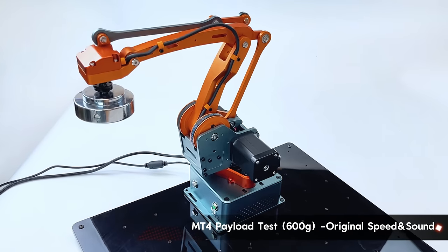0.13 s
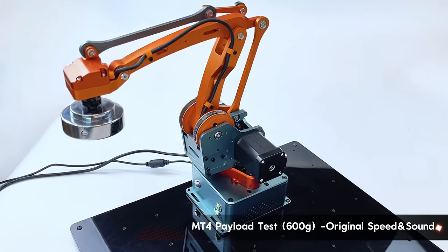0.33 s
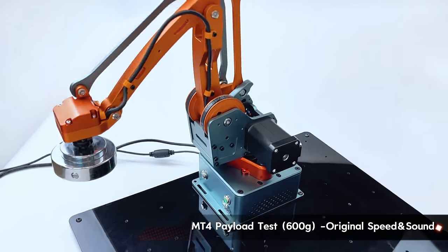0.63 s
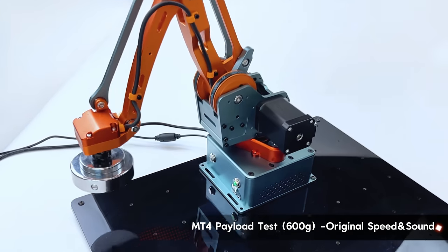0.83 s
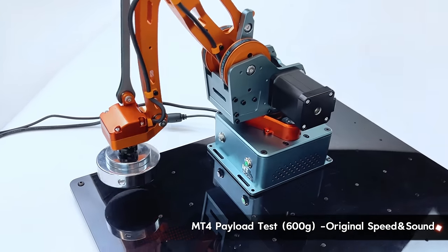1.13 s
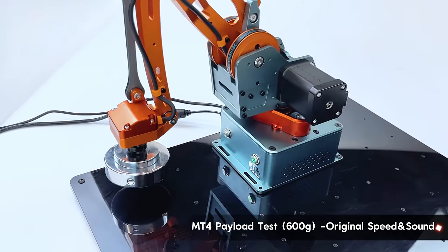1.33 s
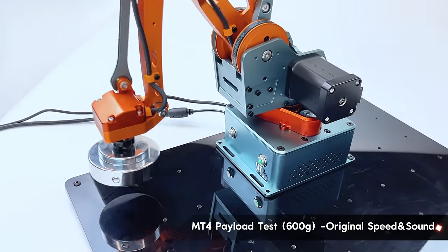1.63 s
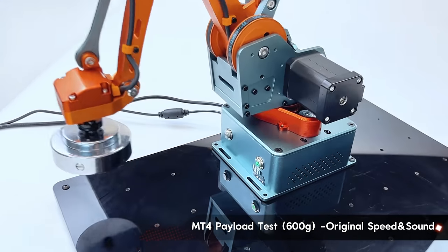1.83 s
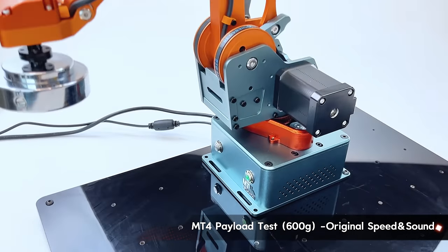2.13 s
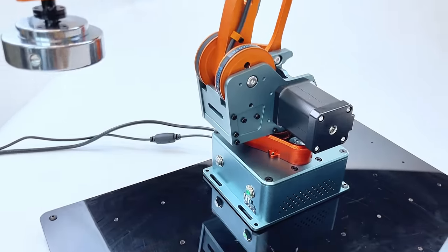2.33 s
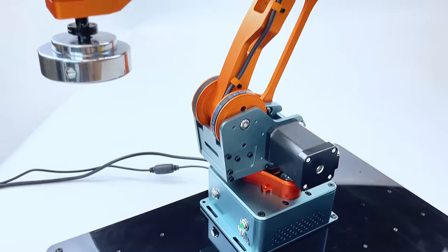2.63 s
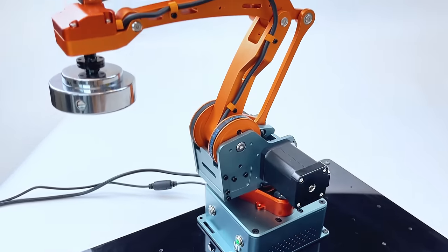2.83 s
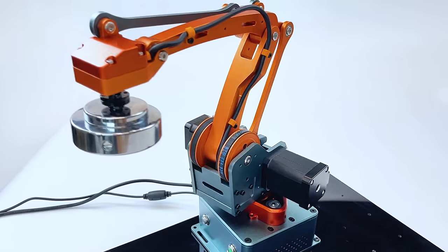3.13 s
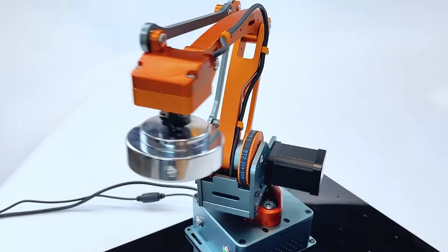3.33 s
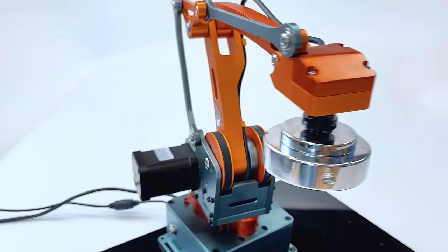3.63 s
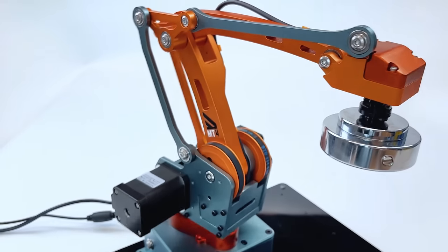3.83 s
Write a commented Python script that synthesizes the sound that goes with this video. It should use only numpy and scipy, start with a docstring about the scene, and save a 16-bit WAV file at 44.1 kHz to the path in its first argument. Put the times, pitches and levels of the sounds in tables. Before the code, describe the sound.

Stepper motors of a small robot arm give a smooth low hum, rising from about 0.2 s, peaking near 0.7 and fading by 1.1. A second rise and fall runs from 1.7 to 2.5 s, swelling unevenly as the plate resonates. Soft low thumps and rumble cluster from 1.5 to 2.9. From 3.2 s the base turns with a fainter hum, thin whine and grainy high hiss. Room fans hiss steadily throughout, close stereo.

```python
"""A steel plate in a room with fans: a small robot arm on it lowers and lifts a weight, then turns on its base.
Two stepper motors sound as sines sweeping up and down in pitch, swelling where the plate resonates.
The base drive is a set of whining sines, a band of grainy hiss and two ticks.
Fans are wavering sines over coloured noise; a low noise rumble with soft thumps lies below.
Two close microphone ports differ in phase and level by frequency."""
import sys
import numpy as np
from scipy import signal
from scipy.fft import rfft, irfft
from scipy.io import wavfile
from scipy.ndimage import uniform_filter1d

SR = 44100
rng = np.random.default_rng(int(sys.argv[2]) if len(sys.argv) > 2 else 0)


def gain_from_db(level_db):
    """Turn a decibel level (scalar or array-like) into a linear amplitude factor."""
    decades = np.asarray(level_db, float) / 20
    return 10 ** decades


def file_out(sig):
    """Save sig as 16-bit WAV at sys.argv[1]."""
    # one column per channel
    cols = np.atleast_2d(sig).T
    # limit, then scale
    lim = np.clip(cols, -1, 1)
    pcm = np.round(lim * 32767).astype(np.int16)
    wavfile.write(sys.argv[1], SR, pcm)


N = 176400

# low noise colour: (frequency [Hz], relative density [dB per Hz])
RUMBLE_COLOUR = [(35, -18.5), (50, -1.5), (90, -0.5), (120, -2.5), (170, -9.5), (300, -19), (420, -27),
                 (900, -120)]
# low noise level before lumps: (time [s], rms level [dB])
RUMBLE_LEVEL = [(0, -38.5), (.3, -39.5), (.45, -35.5), (.8, -37), (1.2, -40), (1.5, -35.5), (1.8, -33),
                (2.3, -32.5), (2.6, -37.5), (2.9, -37), (3.05, -40), (3.2, -61)]
# soft thumps, each a short swell of one or two cycles: (time [s], peak level [dB])
THUMPS = [(1.474, -18.5), (1.728, -20.5), (2.439, -21.5), (2.532, -20.5), (2.551, -18.5), (2.624, -33),
          (2.68, -23), (2.701, -29.5), (2.802, -23), (2.841, -22.5), (2.879, -25.5), (2.933, -27),
          (3.123, -30), (3.623, -30.5), (3.883, -33)]
# blade tones before fade and roughness: (frequency [Hz], rms level [dB])
FAN_LINES = [(397, -61), (452, -65), (793, -68), (908, -73), (1190, -73.5), (1587, -69), (3368, -74),
             (5027, -82)]
# blade tones recede as the listener moves: (time [s], gain [dB])
FAN_FADE = [(.9, 3), (1.6, 2.5), (3.1, -2.5)]
# fan and room hiss colour: (frequency [Hz], relative density [dB per Hz])
AIR_COLOUR = [(25, -19), (60, 8), (146, 5), (210, -0.5), (310, -3), (430, -7), (520, -6), (690, -11),
              (820, -14), (1050, -15.5), (1300, -15), (1600, -8), (1750, -13.5), (2000, -18.5), (2500, -19),
              (2900, -24), (3400, -20), (3900, -18.5), (4500, -23), (5200, -28.5), (8500, -35),
              (12000, -43.5), (14300, -45), (15000, -72)]
# base turn: (time [s], share of full speed [0-1], gain of low tones [dB], gain of high whine [dB])
BASE_TURN = [(3.2, .76, -11, -24), (3.34, 1, -2, -7), (3.53, 1, -3, 5), (3.9, 1, 0, 7)]
# base step and gear tones at full speed, before those gains: (frequency [Hz], rms level [dB])
BASE_LINES = [(150, -52), (307, -57), (603, -63), (2013, -64.5), (2250, -71), (5857, -82.5), (6988, -84)]
# hiss of the base drive, before grain: (time [s], centre frequency [Hz], rms level [dB])
BASE_HISS = [(2.98, 11500, -92), (3.15, 11500, -72.5), (3.35, 11400, -72.5), (3.55, 11400, -75.5),
             (3.72, 12800, -71.5), (3.88, 13440, -69.5), (4, 12500, -76)]
# base drive ticks: (time [s], peak level [dB], frequency [Hz])
BASE_TICKS = [(2.941, -62, 13030), (3.146, -58, 11500)]
# arm speed ramps: (start [s], top [s], end [s], shoulder peak before rounding [Hz],
# elbow peak before rounding [Hz], overtones at resonance [dB])
ARM_MOVES = [(.039, .71, 1.45, 308, 222, -78), (1.428, 2.072, 2.81, 307, 221, -63)]
# step tones swelling where the plate resonates, one list per move: (time [s], rms level [dB])
SHOULDER_LEVEL = [
    [(.22, -55), (.33, -31), (.37, -33), (.47, -42.5), (.51, -32), (.54, -24), (.566, -40.5), (.588, -24.5),
     (.62, -38.5), (.7, -25), (.756, -28), (.79, -40.5), (.84, -37.5), (.87, -57)],
    [(1.7, -40.5), (1.88, -41.5), (1.98, -37), (2.08, -29.5), (2.126, -29.5), (2.168, -37.5), (2.205, -31),
     (2.254, -36.5), (2.294, -25.5), (2.326, -44), (2.37, -34), (2.43, -34.5), (2.48, -46.5)],
]
ELBOW_LEVEL = [
    [(.58, -34), (.66, -41.5), (.72, -31), (.8, -42.5), (.88, -32.5), (.92, -41.5), (1.01, -29),
     (1.06, -46)],
    [(1.8, -49), (1.86, -36), (1.95, -42), (2.09, -32), (2.2, -39), (2.3, -65)],
]
# shoulder overtones heard as they cross an arm resonance: (multiple of step rate, resonance [Hz])
ARM_OVERTONES = [(4, 1070), (6, 1600)]
# part of the noise common to both ports: (frequency [Hz], share of power [0-1])
PORT_LIKENESS = [(60, 0.74), (300, 1), (550, 0.81), (700, 0), (1600, 0.52), (1900, 0.7), (4000, 0.93),
                 (6800, 0.64), (8200, 1), (10000, 0.6)]
# phase between ports: (frequency [Hz], left lead [rad])
PORT_LEAD = [(0, -.2), (620, -.85), (780, 1.0), (1200, -.2), (1600, -3), (1720, -5.7), (2300, -5.9),
             (3000, -5.2), (4600, -6), (5600, -7.3), (6800, -7.4), (7700, -9.4), (8800, -9.4),
             (11000, -12.5), (13000, -12.6), (14500, -15.7)]
# level between ports: (frequency [Hz], left minus right [dB])
PORT_TILT = [(60, 0.5), (200, 1), (550, 0), (780, -3.5), (1200, 0), (1600, 0.5), (1800, 7.5), (2200, 1),
             (4500, 2.5), (6000, 0)]

RUMBLE_LUMP_DB = 1
THUMP_HZ, THUMP_SPREAD_SHARE, THUMP_SIGMA_S = 73.7, 0.094, 0.0058
FAN_ROUGH_DB, FAN_WANDER_SHARE = 2.8, 0.001
AIR_DB, AIR_PATCHY_DB = -43.5, 0.96
BASE_ROUGH_DB, WHINE_FROM_HZ = 2.5, 4000
HISS_WIDTH_HZ, HISS_GRAIN_DB = 2200, 2
RAMP_ROUND_S = .08  # rounds the turn at top speed
STEP_ROUGH_DB, STEP_JITTER_SHARE = 1.6, 0.01
ARM_RING_WIDTH_HZ = 140  # overtones are 6 dB down this far off resonance

TIME_S = np.arange(N) / SR
BIN_HZ = np.arange(N // 2 + 1) * SR / N


def rms_one(x):
    """Scale to rms 1."""
    return x / np.sqrt(np.mean(x ** 2) + 1e-20)


def in_time(rows, outside=None):
    """Columns of a table, joined linearly in time."""
    time_s, *columns = np.transpose(rows)
    return [np.interp(TIME_S, time_s, c, left=outside, right=outside) for c in columns]


def at_hz(points, hz):
    """A table read on a log-frequency axis."""
    point_hz, value = np.transpose(points)
    return np.interp(np.log(hz + 1), np.log(point_hz + 1), value)


def drift(rate_hz):
    """Slow chance, spread 1: noise through two equal low-pass poles, run at SR / 40."""
    pole = np.exp(-80 * np.pi * rate_hz / SR)
    white = rng.standard_normal(N // 40 + 2002)
    slow = signal.lfilter([1], [1, -2 * pole, pole * pole], white)[2000:]  # settled part
    return np.interp(np.arange(N) / 40, np.arange(len(slow)), rms_one(slow - slow.mean()))


def tone(hz, db):
    """A sine on a pitch curve and an rms level curve, its ends eased."""
    ends = np.clip(np.minimum(np.arange(N), N - np.arange(N)) / 200, 0, 1)
    cycles = np.cumsum(hz * np.ones(N)) / SR + rng.random()
    return np.sqrt(2) * gain_from_db(db) * ends * np.sin(2 * np.pi * cycles)


def at_ports(x, own=None):
    """Two ports: a shared part with its phase lead, plus any part of each port's own, then tilt."""
    sides = np.array([[.5], [-.5]])  # left, right
    lead_hz, lead_rad = np.transpose(PORT_LEAD)
    ports = rfft(x) * np.exp(1j * sides * np.interp(BIN_HZ, lead_hz, lead_rad))
    if own is not None:
        alike = np.clip(at_hz(PORT_LIKENESS, BIN_HZ), 0, 1)
        ports = np.sqrt(alike) * ports + np.sqrt(1 - alike) * rfft(own)
    return irfft(ports * gain_from_db(sides * at_hz(PORT_TILT, BIN_HZ)), N)


def noise(colour):
    """Stereo noise of a given colour, rms 1: one shared source and one per port."""
    white = rng.standard_normal((3, N))
    coloured = irfft(rfft(white) * gain_from_db(at_hz(colour, BIN_HZ)), N)
    return rms_one(at_ports(coloured[0], coloured[1:]))


def rumble():
    """Lumpy low noise, with soft thumps as Gaussian swells of a low cosine."""
    level_db, = in_time(RUMBLE_LEVEL)
    out = gain_from_db(level_db + RUMBLE_LUMP_DB * drift(22.6)) * noise(RUMBLE_COLOUR)
    for peak_s, db in THUMPS:
        age_s = TIME_S - peak_s
        hz = THUMP_HZ * (1 + THUMP_SPREAD_SHARE * rng.standard_normal())
        swell = np.exp(-.5 * (age_s / THUMP_SIGMA_S) ** 2)
        out = out + gain_from_db(db) * swell * np.cos(2 * np.pi * hz * age_s)
    return out


def fans():
    """Blade tones that waver over a broad hiss whose half-octave bands swell on their own."""
    fade_db, = in_time(FAN_FADE)
    blades = 0
    for line_hz, line_db in FAN_LINES:
        hz = line_hz * (1 + FAN_WANDER_SHARE * drift(1.57))
        blades = blades + tone(hz, line_db + fade_db + FAN_ROUGH_DB * drift(5.7))
    spectrum = rfft(noise(AIR_COLOUR))
    place = np.clip(np.log2(BIN_HZ / 250 + 1e-9) * 2, 0, 11)  # half octaves above 250 Hz
    air = 0
    for k in range(12):
        band = np.cos(np.pi / 2 * np.clip(place - k, -1, 1)) ** 2
        air = air + gain_from_db(AIR_PATCHY_DB * drift(11.0)) * irfft(spectrum * band, N)
    return at_ports(blades) + gain_from_db(AIR_DB) * air


def base_drive():
    """Step and gear tones follow the turn speed; hiss is low-passed noise on a moving carrier; two ticks."""
    share, low_db, whine_db = in_time(BASE_TURN)
    lines = 0
    for full_hz, line_db in BASE_LINES:
        gain_db = whine_db if full_hz > WHINE_FROM_HZ else low_db
        hz = full_hz * share * (1 + 0.001 * drift(9.3))
        lines = lines + tone(hz, line_db + gain_db + BASE_ROUGH_DB * drift(12))
    lines = lines * (TIME_S > BASE_TURN[0][0])

    centre_hz, hiss_db = in_time(BASE_HISS)
    low_pass = signal.butter(2, HISS_WIDTH_HZ / 2, fs=SR, output="sos")
    soft = rms_one(signal.sosfilt(low_pass, rng.standard_normal(N)))
    hiss = soft * tone(centre_hz, hiss_db + HISS_GRAIN_DB * drift(23))
    hiss = hiss * (TIME_S > BASE_HISS[0][0])

    ticks = 0
    for peak_s, db, hz in BASE_TICKS:
        swell = np.exp(-np.abs(TIME_S - peak_s) / 0.0006)
        ticks = ticks + gain_from_db(db) * swell * np.sin(2 * np.pi * hz * TIME_S)
    return at_ports(lines + hiss + ticks)


def step_tone(step_hz, level_rows, overtones, overtone_db):
    """Steps of one motor push the plate; overtones swell as they cross an arm resonance."""
    level_db = uniform_filter1d(in_time(level_rows, outside=-91)[0], size=600)
    level_db = level_db + STEP_ROUGH_DB * drift(28.3)
    hz = step_hz * (1 + STEP_JITTER_SHARE * drift(12.6))
    out = tone(hz, level_db)
    for multiple, ring_hz in overtones:
        off_db = 6 * ((multiple * hz - ring_hz) / ARM_RING_WIDTH_HZ) ** 2
        out = out + tone(multiple * hz, overtone_db - off_db + 3 * drift(25))
    return out


def arm_motors():
    """Shoulder and elbow motors; step pitch follows the speed ramp of each move."""
    out = 0
    for move, shoulder, elbow in zip(ARM_MOVES, SHOULDER_LEVEL, ELBOW_LEVEL):
        start_s, top_s, end_s, shoulder_hz, elbow_hz, overtone_db = move
        ramp = np.interp(TIME_S, [start_s, top_s, end_s], [0, 1, 0])
        speed = uniform_filter1d(ramp, int(RAMP_ROUND_S * SR))
        out = out + step_tone(shoulder_hz * speed, shoulder, ARM_OVERTONES, overtone_db)
        out = out + step_tone(elbow_hz * speed, elbow, [], overtone_db)
    return at_ports(out)


def scene():
    """All sources at the two ports."""
    return rumble() + fans() + base_drive() + arm_motors()


def band_limit(x):
    """A steep low-pass at the top of the band."""
    return signal.sosfilt(signal.butter(12, 15580, fs=SR, output="sos"), x)


def record(dry):
    """The finished mix, as delivered."""
    return band_limit(dry)


dry = scene()
out = record(dry)
file_out(out)
```